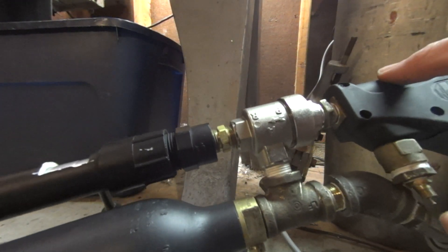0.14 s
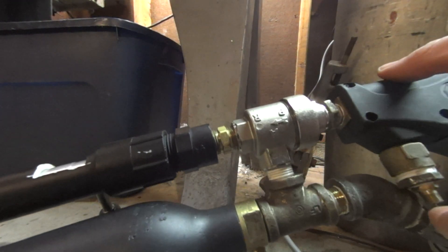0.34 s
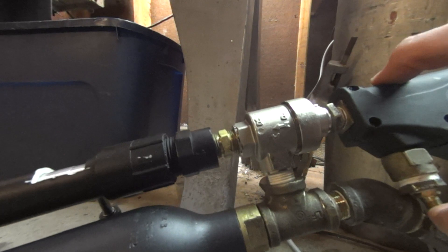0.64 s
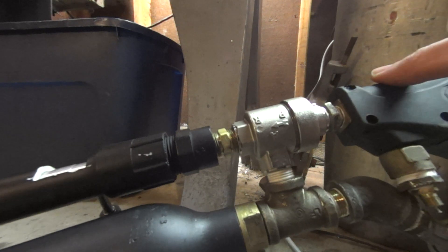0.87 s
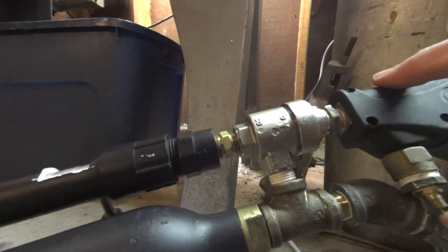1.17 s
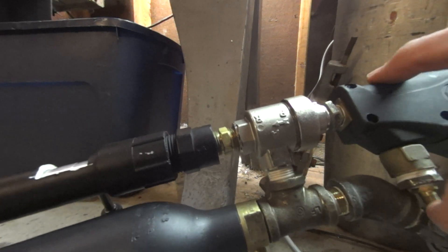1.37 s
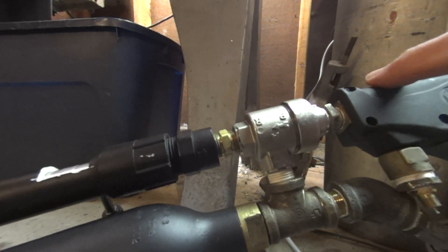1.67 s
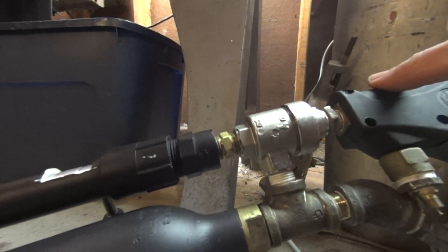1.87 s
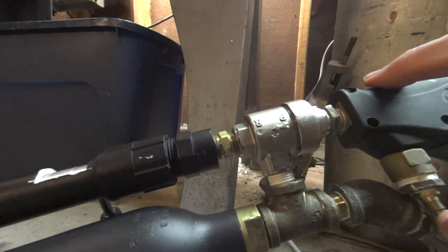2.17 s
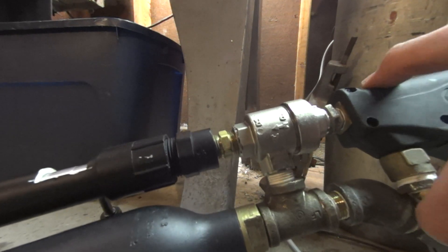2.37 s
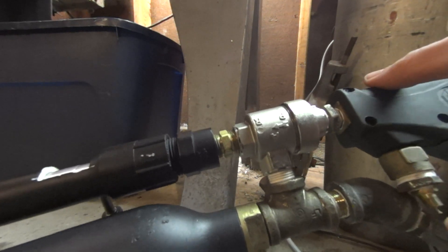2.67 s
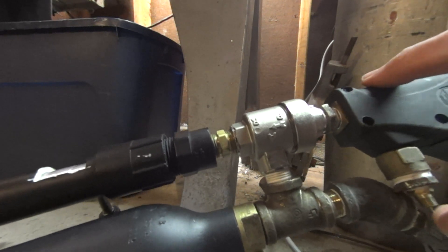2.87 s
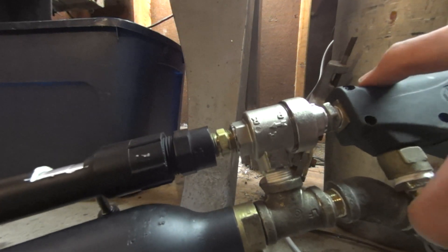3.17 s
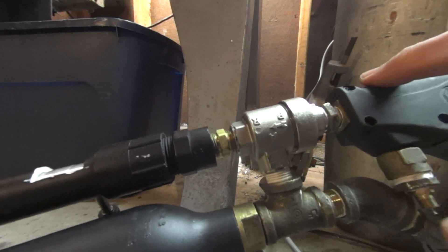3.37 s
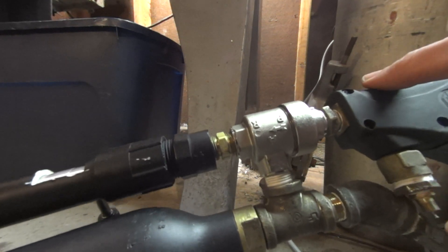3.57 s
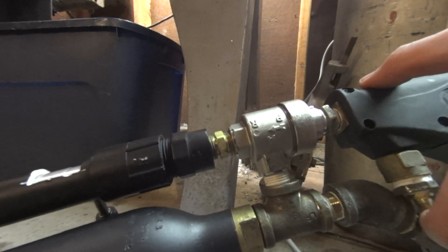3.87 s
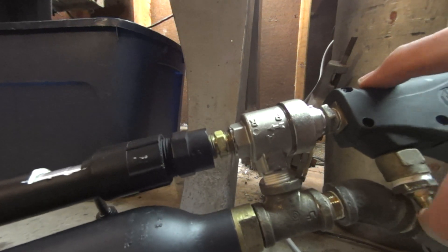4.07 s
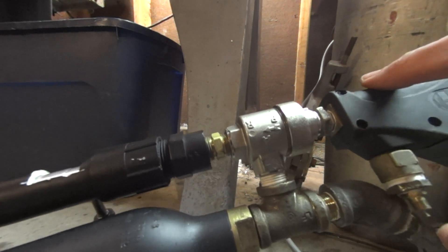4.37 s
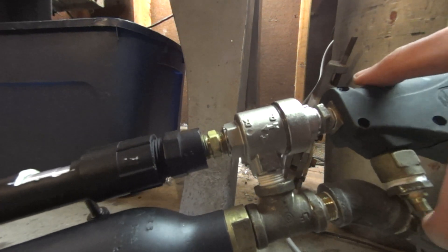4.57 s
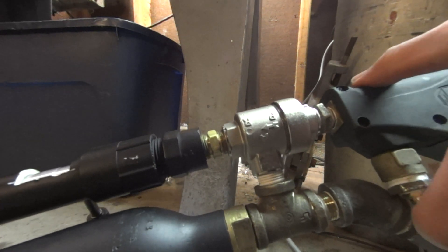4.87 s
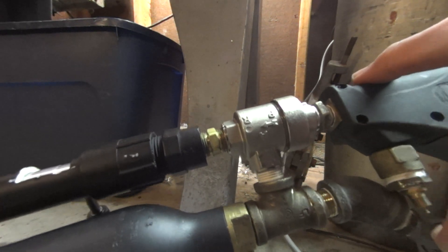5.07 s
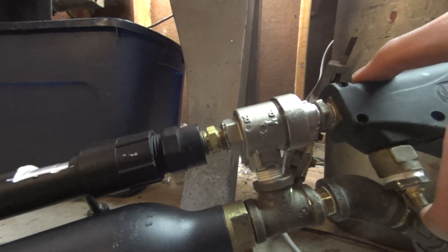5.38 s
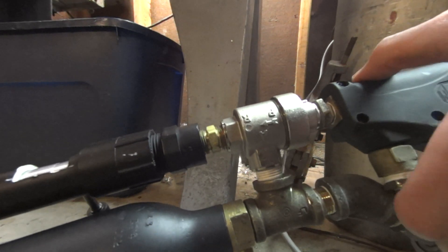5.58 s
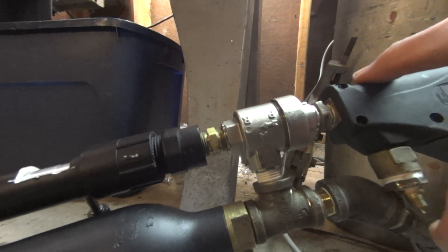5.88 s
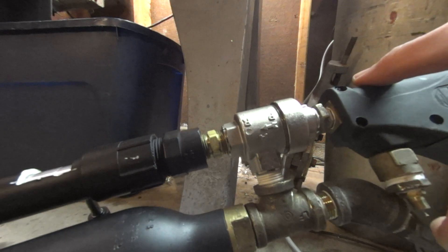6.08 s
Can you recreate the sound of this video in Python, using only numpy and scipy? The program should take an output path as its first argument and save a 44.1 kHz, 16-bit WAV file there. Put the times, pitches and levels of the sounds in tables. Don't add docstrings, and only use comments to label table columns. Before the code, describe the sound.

A compressed-air rifle fires eight hard blasts in a small hard-walled room, with metallic trigger clicks, ringing pipework and brief puffs of vented air.

```python
import sys
import numpy as np
from scipy import signal
from scipy.io import wavfile
from scipy.ndimage import uniform_filter1d

SR = 44100
rng = np.random.default_rng(int(sys.argv[2]) if len(sys.argv) > 2 else 0)


def waveform_to_disk(signal):
    frames = np.transpose(np.atleast_2d(signal))
    scaled = np.clip(frames, -1, 1) * 32767
    samples = np.round(scaled).astype(np.int16)
    wavfile.write(sys.argv[1], SR, samples)


def makeup_ratio(level_db):
    decades = np.asarray(level_db, float) / 20
    return 10 ** decades


N = 274743


def evened(x):
    return x / np.sqrt(np.mean(x ** 2) + 1e-20)


def read(points, hz):
    f, value = np.transpose(points)
    return np.interp(np.log(hz + 1), np.log(f + 1), value)


def add(mix, s, sound):
    part = mix[..., round(s * SR):][..., :sound.shape[-1]]
    part += sound[..., :part.shape[-1]]


def colour(x, points):
    hz = abs(np.fft.fftfreq(4096, 1 / SR))
    log_gain = np.log(makeup_ratio(np.maximum(read(points, hz), -80)))
    taps = np.fft.ifft(np.exp(np.conj(signal.hilbert(log_gain)))).real[:2048]
    shaped = signal.fftconvolve(x, taps.reshape((1,) * (x.ndim - 1) + (-1,)), axes=-1)
    return shaped[..., :x.shape[-1]] / np.linalg.norm(taps)


def pair(size, same, gain):
    noises = rng.standard_normal((2, size))
    hz, t, z = signal.stft(noises, SR, nperseg=512, noverlap=384)
    alike = np.clip(read(same, hz), -1, 1)[:, None]
    right = alike * z[0] + np.sqrt(1 - alike ** 2) * z[1]
    z = np.array([z[0], right]) * gain(hz[:, None], t)
    return signal.istft(z, SR, nperseg=512, noverlap=384)[1][:, :size]


def pan(x, db):
    return x * makeup_ratio(np.array([[db / 2], [-db / 2]]))


# frequency in Hz, level in dB per Hz.
FLOOR_SPECTRUM = [(15, -32), (25, 3), (151, -5), (529, -10), (1090, -13), (1550, -15), (1810, -14),
                  (2660, -19.5), (8030, -29.5), (10600, -28.5), (11500, -32), (15000, -66), (22000, -120)]
# frequency in Hz, likeness from 0 to 1.
FLOOR_LIKENESS = [(60, 0.79), (170, 1), (490, 0.19), (1410, 0.03), (4040, 0.087), (11600, 0.39)]
FLOOR_DB = -57


def floor():
    sides = makeup_ratio(np.array([.8, -.8]))[:, None, None]
    return makeup_ratio(FLOOR_DB) * evened(pair(N, FLOOR_LIKENESS, lambda hz, t: makeup_ratio(read(FLOOR_SPECTRUM, hz)) * sides))


# frequency in Hz, level in dB, t60 in seconds, swell in seconds.
MODES = [(74.6, -8, .39, .04), (132, -12, .8, .03), (160.7, -7, .55, .015), (188.4, -6, .6, .04),
         (226.2, -14, .45, .04), (257, 4, .3, .08), (290, -10, .37, .06), (309, 3, .4, .15),
         (351.4, -11, .38, .078), (364, -16, .36, .05), (1836, -19, .45, .017), (3428, -19, .4, .012),
         (4268, -20, .4, .03), (5560, -24, .33, .02)]


def boom():
    t = np.arange(int(1.5 * SR)) / SR
    ringing = np.zeros(len(t))
    for hz, db, t60, rise in MODES:
        swell = (1 - np.exp(-t / rise)) ** 2
        ringing += makeup_ratio(db - 60 * t / t60) * swell * np.sin(2 * np.pi * hz * t)
    return ringing


# frequency in Hz, t60 in seconds.
DECAY = [(60, 1.2), (150, 0.89), (300, 0.54), (700, 0.49), (2000, 0.53), (5000, 0.44), (8000, 0.37),
         (11000, 0.3)]
# frequency in Hz, build-up in seconds.
BUILD_UP = [(60, 0.025), (250, 0.03), (500, 0.093), (1500, 0.043), (6000, 0.055)]
# frequency in Hz, likeness from 0 to 1.
TAIL_LIKENESS = [(60, 1), (140, 0.86), (350, 0.33), (830, 0.61), (2000, 0.35), (4820, 0.64), (11600, 0.67)]
# frequency in Hz, left minus right in dB.
TAIL_LEAN = [(60, 5), (130, 2), (270, 6.5), (570, 6.5), (1210, 7), (2570, 3), (5460, 1.5), (11600, 1)]


def room(lean, share=lambda hz: 1, linger=1):
    def gain(hz, t):
        side_db = lean * read(TAIL_LEAN, hz) / 2
        fill = 1 - np.exp(-(t + 0.042) / read(BUILD_UP, hz))
        ripple = makeup_ratio(2.2 * rng.standard_normal(hz.shape))
        decay = makeup_ratio(-60 * t / linger / read(DECAY, hz))
        sides = np.array([makeup_ratio(side_db), makeup_ratio(-side_db)])
        return np.sqrt(share(hz)) * ripple * fill * decay * sides
    tail = pair(SR, TAIL_LIKENESS, gain)
    clumps = evened(uniform_filter1d(rng.standard_normal(SR), 40))
    fade_in = np.clip(np.arange(SR) / (.013 * SR), 0, 1)
    return tail * makeup_ratio(0.43 * clumps) * fade_in / 45


# time in seconds, level in dB.
RESEATINGS = [
    (0.619, -29),
    (1.488, -35),
    (2.36, -35),
    (3.195, -38),
    (3.971, -42.5),
    (4.797, -38),
    (5.635, -43.5),
]


def knocks():
    out, t = np.zeros(N), np.arange(900) / SR
    push = np.sin(2 * np.pi * 230 * t)
    envelope = np.exp(-t / 0.0024) * np.minimum(t / 0.0013, 1)
    band = signal.butter(2, [250, 600], "band", fs=SR, output="sos")
    for s, db in RESEATINGS:
        rattle = evened(signal.sosfilt(band, rng.standard_normal(len(t))))
        add(out, s, makeup_ratio(db) * (push + 0.31 * rattle) * envelope)
    return out


# time in seconds, peak in dB, ringing in Hz, contact length in seconds.
HANDLING = [(.0074, -37, 5500, .0084), (0.618, -24, 9250, .0067), (1.4754, -44, 7080, 0.0022),
            (1.482, -36, 8000, .0036), (1.759, -37.5, 8500, 0.0048), (2.137, -22, 4900, 0.011),
            (2.3595, -26, 8840, 0.015), (2.598, -46, 6540, 0.0046), (2.606, -44, 8800, 0.0032),
            (2.6356, -36, 8500, 0.0065), (3.011, -21, 4800, 0.0083), (3.423, -54, 5800, .0042),
            (3.443, -43.5, 9100, .0042), (3.486, -47, 8500, .0066), (3.582, -32, 4970, 0.0065),
            (4.242, -46, 6900, 0.004), (4.249, -42, 8500, .004), (4.268, -41, 8400, 0.004),
            (4.6105, -22, 4200, 0.0044), (5.06, -46, 9300, 0.0042), (5.095, -37, 5700, .0059),
            (5.1827, -33.5, 5420, 0.0066), (5.902, -47, 6100, 0.0047), (5.91, -47, 9750, .0036),
            (5.954, -34, 8550, 0.0066), (6.018, -30, 4120, 0.0082)]
# frequency in Hz, level in dB per Hz.
SCRAPE_SPECTRUM = [(210, -44), (350, 1), (1280, 5.5), (2410, 2.5), (4860, 7), (7750, 5.5), (8970, 1),
                   (10400, 1.5), (11500, -53), (15000, -79), (22000, -120)]
# time in seconds, peak in dB.
SEAR_CLICKS = [
    (0.1277, -19),
    (1.031, -20.5),
    (1.879, -24),
    (2.7422, -27),
    (3.566, -31.5),
    (4.335, -30),
    (5.191, -32.5),
]
# time in seconds, peak in dB.
LINKAGE = [
    (0.118, -38),
    (.135, -27),
    (1.023, -41.5),
    (1.042, -24),
    (3.589, -29),
    (4.343, -31),
    (4.361, -24),
    (5.164, -46),
    (5.993, -38),
    (6.03, -37),
]
# time in seconds, peak in dB.
LATCH_CLICKS = [
    (3.1935, -27),
    (3.9695, -28),
    (4.795, -24),
    (5.6322, -21),
]
PULL_HZ, PULL_SPREAD, PULL_S = 1620, 0.13, 0.0068
LATCH_HZ, LATCH_S = 7500, .0015
PULL_LEFT_DB, TICK_LEFT_DB = 4, -4
CLICK_RING, RATTLE_RING = 0.49, 0.98


def ticks():
    out, t = np.zeros((2, N)), np.arange(2000) / SR
    rows = [(*row, TICK_LEFT_DB, CLICK_RING) for row in HANDLING]
    rows += [(s, db, LATCH_HZ, LATCH_S, TICK_LEFT_DB, CLICK_RING) for s, db in LATCH_CLICKS]
    for events, share in [(SEAR_CLICKS, CLICK_RING), (LINKAGE, RATTLE_RING)]:
        for s, db in events:
            hz = PULL_HZ * (1 + PULL_SPREAD * rng.uniform(-1, 1))
            rows.append((s, db, hz, PULL_S, PULL_LEFT_DB, share))
    radius = np.exp(-np.pi * 500 / SR)
    for s, db, hz, length, side_db, share in rows:
        contact = np.exp(-(t / max(length, .001)) ** 2) * np.minimum(t / 0.000082, 1)
        scrape = rng.standard_normal(len(t)) * contact
        poles = [1, -2 * radius * np.cos(2 * np.pi * hz / SR), radius * radius]
        ring = signal.lfilter([1], poles, scrape)
        tick = evened(colour(scrape, SCRAPE_SPECTRUM)) + share * evened(ring)
        add(out, s, pan(makeup_ratio(db) * tick / abs(tick).max(), side_db))
    return out


# peak in seconds, opening in seconds, time held open in seconds,
# hiss in dB, refill hiss in dB.
RELEASES = [
    (0.626, 0.012, 0.0065, -13, -24),
    (.838, 0.037, 0.0028, -27.5, -72),
    (1.498, 0.018, 0.0086, -13, -29.5),
    (1.713, 0.014, 0.0037, -33.5, -66),
    (2.3651, 0.0029, 0.023, -15, -34),
    (3.198, 0.0063, 0.027, -16, -38),
    (3.973, 0.0043, 0.021, -17, -38.5),
    (4.229, 0.0046, 0.0033, -40.5, -63),
    (4.798, 0.0054, 0.025, -16.5, -40),
    (5.637, .004, 0.017, -15.5, -50),
]
# frequency in Hz, level in dB per Hz.
AIR_SPECTRUM = [(180, -35), (300, -6.5), (684, -8), (1280, -5), (2180, -5), (2660, 2.5), (5880, -6),
                (8100, -1), (10700, -3.5), (11500, 1.5), (15000, -53), (22000, -120)]
OPENING_CURVE, SAG_DB_PER_S, SHUT_DB_PER_S = 1.48, 327, 1813
POP_DB, POP_S = 4, .003
LOW_DB, LOW_SAG_DB_PER_S = -17, 320
REFILL_DB_PER_S, REFILL_LOW_DB, REFILL_LOW_DB_PER_S = 168, -4.5, 117


def puffs():
    out = np.zeros(N)
    hiss = evened(colour(rng.standard_normal(N + SR), AIR_SPECTRUM))
    sputter = makeup_ratio(2.0 * evened(uniform_filter1d(rng.standard_normal(N + SR), 30)))
    dull = signal.sosfiltfilt(signal.butter(4, 4700, fs=SR, output="sos"), hiss)
    high, low = evened(hiss - dull) * sputter, evened(dull) * sputter
    for peak_s, opening, held, db, refill_db in RELEASES:
        start = peak_s - opening
        t = np.arange(-opening, .35, 1 / SR)
        at = round(start * SR) + np.arange(len(t))
        after = np.maximum(t, 0)
        swell = np.clip(1 + t / opening, 0, 1) ** OPENING_CURVE
        pop_db = POP_DB * np.exp(-abs(t) / POP_S)
        fall_db = SAG_DB_PER_S * after + SHUT_DB_PER_S * np.maximum(t - held, 0)
        jet = swell * makeup_ratio(db - 6.5 + pop_db - fall_db)
        refill = np.clip(t / held, 0, 1) * makeup_ratio(refill_db - 14)
        high_level = jet + refill * makeup_ratio(-REFILL_DB_PER_S * (t - held))
        low_level = jet * makeup_ratio(LOW_DB - LOW_SAG_DB_PER_S * after)
        low_level += refill * makeup_ratio(REFILL_LOW_DB - REFILL_LOW_DB_PER_S * (t - held))
        add(out, start, high[at] * high_level + low[at] * low_level)
    return out


# time in seconds, peak on the left (1 is full scale).
CRACKS = [
    (.1465, .72),
    (1.0507, .76),
    (1.9052, 1.0),
    (2.7678, 1.03),
    (3.5997, .9),
    (4.3702, .9),
    (5.21, .86),
    (6.0432, .86),
]
# air in dB, valve thump in dB, linger of the jet as a ratio to the room's decay.
CHARGES = [
    (-.5, -19.5, 1.166),
    (-.5, -19, 1.11),
    (.5, -17, 1.075),
    (.49, -18, 1.026),
    (.49, -15, 1),
    (.49, -18, 1.02),
    (.49, -15, 0.97),
    (.49, -15.5, 0.81),
]
# frequency in Hz, level in dB per Hz.
BLAST_SPECTRUM = [(25, -26), (42, -28), (64, -23.5), (180, -17), (217, -10.5), (309, -6.5), (450, -9.5),
                  (1000, -4), (1180, -4), (1290, -5.5), (1840, -3.5), (2680, -4), (4820, -2), (10500, -8),
                  (11500, -5.5), (15000, -49), (22000, -120)]
# frequency in Hz, share alike in every shot from 0 to 1.
ALIKE_SHARE = [(200, .95), (800, .86), (2500, .66), (6500, .36)]
# delay in seconds, left in dB, right in dB.
REFLECTIONS = [(0, 0, -16), (.00155, -4, -7), (.0023, -13, -13), (.0036, -12, -7), (.005, -13, -12),
               (.0066, -13, -12), (.0099, -10, -11)]


def muzzle_front(t):
    front = .55 * np.exp(-(t / .00028) ** 2) + .75 * np.exp(-(t / .00011) ** 2)
    front *= np.minimum(t / .00004, 1)
    front -= .7 * np.exp(-((t - .00044) / .00011) ** 2)
    return np.r_[-.8 * np.hanning(7), front]


def first_reflections():
    early = np.zeros((2, 600))
    for delay, *db in REFLECTIONS:
        early[:, round(delay * SR)] = makeup_ratio(np.array(db))
    early[:, 1:] = signal.lfilter([1.1, -.8], [1], early[:, 1:])
    return early


def shots():
    crack, walls, thump = np.zeros(N), np.zeros((2, N)), np.zeros(N)
    t = np.arange(2048) / SR
    front = muzzle_front(t)
    push = np.sin(2 * np.pi * 640 * t) * np.exp(-(t / .0016) ** 2)
    by_front = room(1.0, lambda hz: read(ALIKE_SHARE, hz)) + makeup_ratio(-38.5) * pan(boom()[:SR], 7.1)
    for (s, peak), (air_db, thump_db, linger) in zip(CRACKS, CHARGES):
        by_jet = room(1.0, lambda hz: 1 - read(ALIKE_SHARE, hz), linger)
        add(walls, s, makeup_ratio(air_db) * (by_front + by_jet))
        add(crack, s, peak * front)
        rasp = .3 * rng.standard_normal(2048) * np.exp(-t / .004)
        add(thump, s - .0043, makeup_ratio(thump_db) * (push + rasp))
    direct = signal.fftconvolve(crack[None], first_reflections(), axes=1)[:, :N]
    return direct + makeup_ratio(33.0) * colour(walls, BLAST_SPECTRUM) + pan(thump, 7.8)


def scene():
    near, knock = pan(puffs(), -4) + ticks(), knocks()
    into_room = makeup_ratio(-8.5) * near.mean(0) + makeup_ratio(7.5) * knock
    echo = signal.fftconvolve(into_room[None], room(1.0), axes=1)[:, :N]
    woken = makeup_ratio(-38) * signal.fftconvolve(np.gradient(knock) * 30, boom())[:N]
    return floor() + pan(makeup_ratio(4.5) * woken, 5) + echo + pan(2.2 * knock, 6.3) + near + shots()


def low_pass(x):
    return signal.sosfilt(signal.butter(12, 12180, fs=SR, output="sos"), x)


def record(dry):
    power = signal.lfilter([.012], [1, -.988], (dry ** 2).mean(0))
    power_db = 10 * np.log10(power + 1e-12)
    fall = np.arange(N) * 150. / SR
    over_db = np.maximum(np.maximum.accumulate(power_db + fall) - fall + 14.5, 0)
    settled = signal.lfilter([.0009], [1, -.9991], over_db)
    over_db = over_db + 0.46 * np.maximum(over_db - settled, 0)
    ducked = dry / makeup_ratio(.95 * over_db)
    ducked = signal.sosfilt(signal.butter(2, 45, "high", fs=SR, output="sos"), ducked)
    taps = signal.firwin(255, 11050, window=("kaiser", 5), fs=SR)
    limited = signal.oaconvolve(ducked, taps[None], "same")
    return low_pass(np.clip(limited, -1, 1))


dry = scene()
out = record(dry)
waveform_to_disk(out)
```